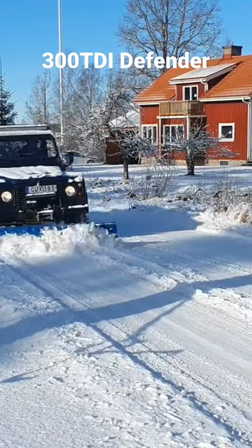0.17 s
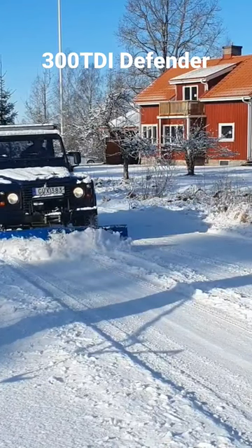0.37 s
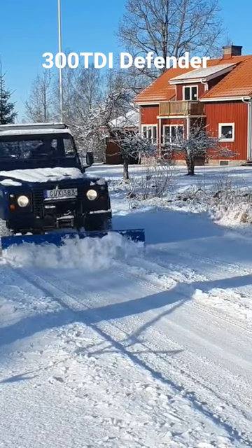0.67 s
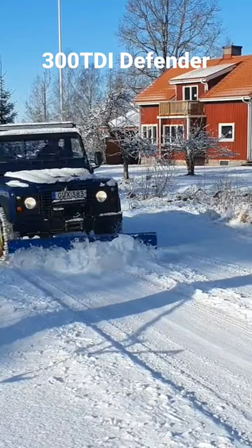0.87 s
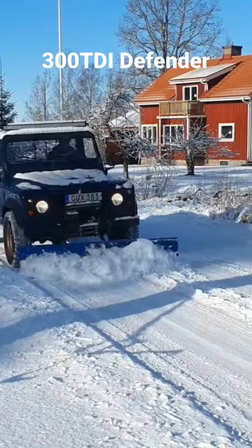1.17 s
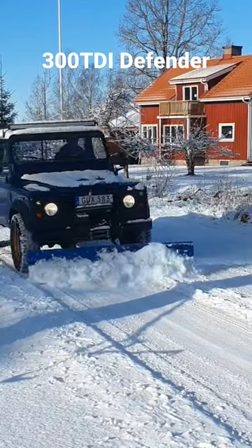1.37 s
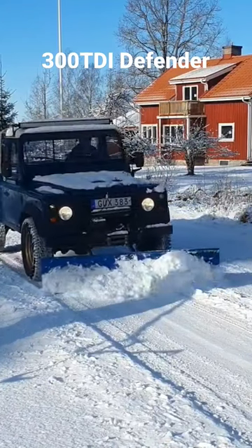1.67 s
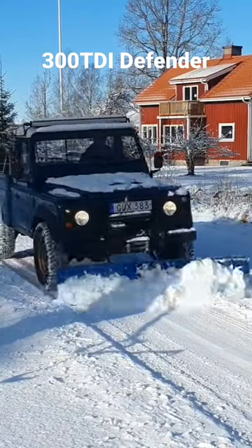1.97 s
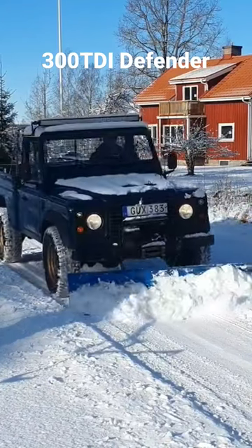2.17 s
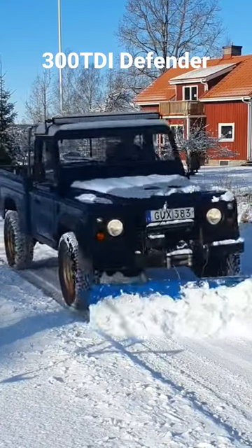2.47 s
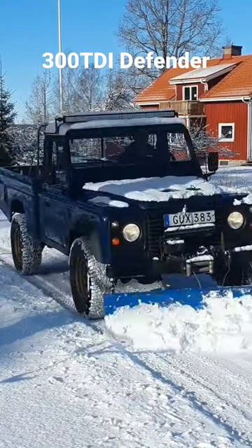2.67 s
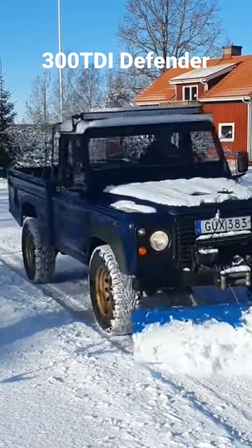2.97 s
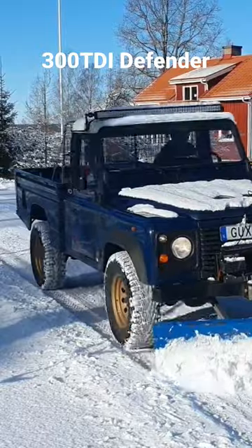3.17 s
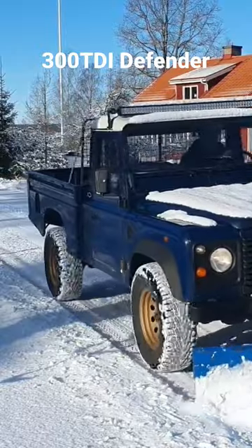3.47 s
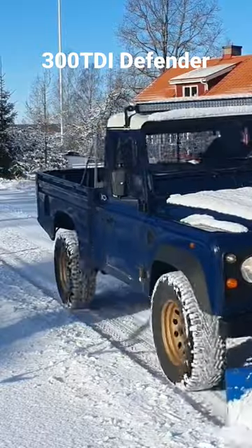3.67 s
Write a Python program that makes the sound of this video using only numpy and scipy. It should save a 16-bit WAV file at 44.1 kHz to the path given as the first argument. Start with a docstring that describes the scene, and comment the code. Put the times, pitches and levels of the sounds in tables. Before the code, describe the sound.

Diesel truck rattling nearer at low steady revs, plow blade knocking and scraping through crunchy snow.

```python
"""Snowy yard: a four-cylinder diesel truck creeps up from the left until level, pushing snow with a steel blade.
Firings strike engine resonances and gate clatter noise; low orders waver over patchy exhaust noise.
Blade and mount thud and clank: ragged bursts of contacts ring steel modes. Snow is crunching coloured noise.
Two microphone ports hear the treble from the left, less so as the truck draws level.
Faint noise in the top treble is kept in some patches and dropped in others."""
import sys
import numpy as np
from scipy import signal
from scipy.fft import rfft, irfft, next_fast_len
from scipy.io import wavfile
from scipy.ndimage import uniform_filter1d, map_coordinates

SR = 44100
rng = np.random.default_rng(int(sys.argv[2]) if len(sys.argv) > 2 else 0)


def gain_from_db(level_db):
    """Convert decibel levels to linear amplitude factors (20 dB per decade)."""
    decades = np.asarray(level_db, float) / 20
    return 10 ** decades


def generate_wav(sig):
    """Save sig (samples, or channels by samples) to the path in sys.argv[1] as 16-bit PCM at SR."""
    pcm = np.round(np.clip(np.atleast_2d(sig).T, -1, 1) * 32767).astype(np.int16)
    wavfile.write(sys.argv[1], SR, pcm)


N = 168462
SECONDS = np.arange(N) / SR


def unit(x):
    """Scale to rms 1."""
    return x / np.sqrt(np.mean(x ** 2) + 1e-20)


def along(points, hz):
    """Interpolate (Hz, value) points on a log frequency axis."""
    f, v = np.transpose(points)
    return np.interp(np.log(hz + 1), np.log(f + 1), v)


def wobble(knots_per_s):
    """Smooth random curve through normal knots."""
    knots = rng.standard_normal(int(N * knots_per_s / SR) + 4)
    return map_coordinates(knots, [np.arange(N) * knots_per_s / SR])


def filtered(x, response):
    """Multiply the spectrum of x by a complex response of frequency."""
    m = next_fast_len(N + SR // 2)
    return irfft(rfft(x, m) * response(np.fft.rfftfreq(m, 1 / SR)), m)[..., :N]


def resonances(peaks):
    """Causal response of a bank of resonances of alternating sign."""
    def response(f):
        total = 0
        for k, (centre, width, db) in enumerate(peaks):
            total = total + (-1) ** k * gain_from_db(db) * 1j * f * width / (centre ** 2 - f ** 2 + 1j * f * width)
        return total
    return response


def patches(shape, bins, frames):
    """Random time-frequency field, smoothed into patches."""
    field = uniform_filter1d(rng.standard_normal(shape), size=bins, axis=0)
    return unit(uniform_filter1d(field, size=frames, axis=1))


def rush(spectrum, patchy_db, gate=1):
    """Gated coloured noise of rms 1 with patches of random gain."""
    z = signal.stft(gate * rng.standard_normal(N), nperseg=512)[2]
    gain = gain_from_db(patchy_db * patches(z.shape, bins=5, frames=8))
    x = signal.istft(z * gain, nperseg=512)[1][:N]
    return unit(filtered(x, lambda hz: gain_from_db(along(spectrum, hz))))


# Truck's work. Each row: time in seconds, knock base level in dB, exhaust base level in dB,
# snow base level in dB (before SNOW_DB).
WORK = [(0.0, -38.5, -34, -38.5), (0.36, -37, -38, -39), (1.2, -37, -39.5, -40),
        (1.41, -35.5, -38.5, -40.5), (1.82, -36, -39, -40.5), (2.37, -34, -38, -37.5),
        (2.88, -34, -37.5, -35), (3.02, -34.5, -36.5, -34), (3.47, -34, -33.5, -31),
        (3.56, -35.5, -33, -31.5), (3.82, -34.5, -31.5, -29.5)]


def work_levels():
    """Knock, exhaust and snow levels, sample by sample."""
    s, *columns = np.transpose(WORK)
    return [np.interp(SECONDS, s, column) for column in columns]


# Approach. Each row: time in seconds, share of the way from far left to level (0 to 1).
APPROACH = [(0, 0.04), (1.6, 0.1), (2.9, 0.64), (3.82, 0.99)]


def nearness(seconds):
    """Share of the way the truck has come."""
    return np.interp(seconds, *np.transpose(APPROACH))


# Top treble colour. Each row: frequency in Hz, relative level in dB.
TOP_COLOUR = [(7000, -46), (8000, -0.5), (11000, 2), (13500, 4.5), (15600, -4), (15750, -120)]
# How readily the top treble is kept, in time. Each row: time in seconds, offset in spreads of the chance field.
KEPT_IN_TIME = [(0, -.9), (1, -.5), (1.8, .1), (3.82, 0)]
# How readily it is kept, by frequency. Each row: frequency in Hz, offset in spreads of the chance field.
KEPT_BY_HZ = [(8500, -.7), (11500, .2), (13600, .5), (15500, -1)]
TOP_START_DB, TOP_GROWS_DB_PER_S = -63.5, 1  # before the flares
FLARE_RMS, FLARE_S = .65, .006  # scale after the square root; time constant


def top_treble():
    """Faint top treble, partly shared by the ports, kept in some patches, dropped in others; louder with the clanks."""
    at = [round(row[0] * SR) for row in MOUNT_CLANKS]
    bursts = np.bincount(at, gain_from_db([2 * row[1] for row in MOUNT_CLANKS]), N)
    smoothed = unit(filtered(bursts, lambda f: 1 / (1 + 2j * np.pi * f * FLARE_S) ** 2))
    flare = FLARE_RMS * np.sqrt(np.abs(smoothed))
    hz, t, z = signal.stft(rng.standard_normal((3, N)), SR, nperseg=1024)
    chance = patches(z.shape[1:], bins=9, frames=6) + along(KEPT_BY_HZ, hz)[:, None]
    chance = chance + np.interp(t, *np.transpose(KEPT_IN_TIME)) + np.interp(t, SECONDS, flare)
    kept = chance > 0
    shared, left, right = signal.istft(z * kept, nperseg=1024)[1][:, :N]
    pair = np.array([shared + 2.9 * left, np.roll(shared, shift=2) + 3.0 * right])
    noise = unit(filtered(pair, lambda hz: gain_from_db(along(TOP_COLOUR, hz))))
    return gain_from_db(TOP_START_DB + TOP_GROWS_DB_PER_S * SECONDS) * (1 + flare ** 2) * noise


# Snow colour. Each row: frequency in Hz, relative level in dB.
SNOW_COLOUR = [(880, -1.5), (1500, -11), (1710, -3.5), (2150, -8), (2980, -6), (3550, -14), (4330, -8),
               (4760, -11.5), (6660, -18), (8600, -23.5), (11200, -83), (16000, -120)]
SNOW_DB = -2.5


def snow():
    """Snow rolls and crunches off the blade: coloured noise under a fast and a slow random gain."""
    crunch = gain_from_db(0.68 * wobble(300) + 1.2 * wobble(24.88))
    return gain_from_db(work_levels()[2] + SNOW_DB) * rush(SNOW_COLOUR, patchy_db=2.0, gate=crunch)


def struck(events, modes, rasp, edge, gain_db, rasp_db, grit_db, favour_db):
    """Each event is a ragged rattle of contacts: it rasps and rings the modes, most those near its pitch."""
    favour_oct, detune = 0.25, .012
    out, t = np.zeros(N + SR), np.arange(SR // 4) / SR
    hz = np.fft.rfftfreq(len(t), 1 / SR)
    f, mode_db, t60 = np.transpose(modes)[..., None]

    def peaked(y):
        return y / np.sqrt(uniform_filter1d(y ** 2, size=300).max())

    def tinted(y, points):
        return peaked(irfft(rfft(y) * gain_from_db(along(points, hz)), len(t)))

    def clumps(size):
        return np.repeat(rng.standard_normal(len(t) // size + 1), size)[:len(t)]

    for s, db, pitch_hz, rattle_s, edge_db in events:
        u = t / max(rattle_s, .001)
        ragged = gain_from_db(grit_db * (clumps(size=40) + clumps(size=130)))
        contacts = u ** 3 * np.exp(-2 * u) * ragged * rng.standard_normal(len(t))
        mode_hz = f * (1 + detune * rng.standard_normal(f.shape))
        decays = gain_from_db(-60 * t / t60) * np.sin(2 * np.pi * mode_hz * t)
        rung = signal.fftconvolve(contacts[None], decays, axes=1)[:, :len(t)]
        rung = rung / np.abs(rung).max(axis=1, keepdims=True)
        near_db = favour_db * np.exp(-(np.log2((f + 1) / pitch_hz) / favour_oct) ** 2)
        ring = (gain_from_db(mode_db + near_db + 2 * rng.standard_normal(f.shape)) * rung).sum(axis=0)
        y = peaked(ring) + gain_from_db(rasp_db) * tinted(contacts, rasp)
        y = y + gain_from_db(edge_db) * tinted(np.roll(contacts, 60), edge)
        start = max(round((s - rattle_s / 2) * SR), 0)
        out[start:][:len(t)] += gain_from_db(db + gain_db) * y
    return out[:N]


# Blade on the ground. Each row: time in seconds, level in dB (before gain_db), favoured pitch in Hz,
# rattle time scale in seconds, deep edge in dB over the ring.
BLADE_THUDS = [(0.02, -34, 134, 0.0046, -17), (0.213, -29.5, 148, 0.0097, 5),
               (0.377, -22.5, 233, 0.0028, -1), (0.458, -22, 620, 0.011, -20),
               (0.487, -19.5, 300, 0.0084, -21), (0.516, -22.5, 240, 0.0086, -4),
               (0.545, -38, 165, 0.011, -7), (0.653, -34.5, 291, 0.0071, -1),
               (0.757, -24.5, 413, 0.0059, -10), (0.941, -24, 260, 0.007, -13),
               (1.054, -26, 256, 0.0051, -50), (1.148, -28, 166, 0.0059, 9),
               (1.259, -16.5, 219, 0.009, -11), (1.424, -18, 308, 0.0065, -26),
               (1.453, -20, 240, 0.00774, -10), (2.111, -25.5, 290, 0.0075, -19),
               (2.444, -23, 380, 0.0065, -10), (2.792, -15.5, 244, 0.0063, -32),
               (2.978, -20.5, 255, 0.0068, -8), (3.065, -28.5, 570, 0.0073, -25),
               (3.231, -24.5, 131, 0.0081, -0.5), (3.378, -14, 230, 0.0067, -8.5),
               (3.409, -18, 138, 0.0073, -8), (3.479, -20, 221, 0.0056, -17),
               (3.569, -18, 210, 0.0062, -27), (3.698, -14.5, 236, 0.0057, -15),
               (3.73, -17.5, 252, 0.0076, -6)]
# Blade modes. Each row: nominal frequency in Hz, nominal level in dB, t60 in seconds.
BLADE_MODES = [(62, -14, 0.098), (132, -23, 0.29), (162, 1.5, 0.18), (195.3, -6.5, 0.19),
               (233.1, -3.5, 0.12), (260, -5.5, 0.16), (291, -1, 0.12), (380, 3, 0.11), (492, -1, 0.13),
               (630, 3, 0.051)]
# Blade's dull rasp. Each row: frequency in Hz, relative level in dB.
DULL_RASP = [(40, -42), (100, -30.5), (250, -3), (600, -10.5), (1000, -18), (3000, -71)]
# Deep edge of a thud. Each row: frequency in Hz, relative level in dB.
DEEP_EDGE = [(30, -27), (55, 11), (110, 8), (160, -46), (400, -66)]


def thuds():
    """The blade thuds on the ground: contacts ring its low modes."""
    return struck(BLADE_THUDS, BLADE_MODES, DULL_RASP, DEEP_EDGE,
                  gain_db=-7, rasp_db=-6, grit_db=2.5, favour_db=13)


# Mount and pins. Each row: time in seconds, level in dB (before gain_db), favoured pitch in Hz,
# rattle time scale in seconds, bright edge in dB over the ring.
MOUNT_CLANKS = [(0.0044, -23, 1130, 0.0027, -8.5), (0.2133, -24.5, 1490, 0.0042, -14),
                (0.277, -22.5, 2280, 0.0035, -12), (0.336, -30, 2200, 0.005, -11),
                (0.3549, -19, 2200, 0.0051, -15), (0.377, -21, 2570, 0.003, -9.5),
                (0.4683, -28.5, 2720, 0.0033, -4.5), (0.513, -23.5, 2830, 0.0025, -18),
                (0.6567, -23.5, 2580, 0.0071, -17), (0.668, -22.5, 2012, 0.0039, -17),
                (0.7627, -23, 1850, 0.0021, -17), (0.9019, -28, 2900, 0.0029, -10),
                (0.9343, -22, 2240, 0.0048, -18), (0.9561, -24, 2180, 0.0042, -15),
                (1.1363, -20, 2870, 0.0048, -13.5), (1.2544, -25.5, 2500, 0.0035, -10),
                (1.4142, -18, 2340, 0.0037, -27), (1.4534, -28, 1350, 0.004, -11),
                (2.434, -18, 1710, 0.003, -13.5), (2.5017, -23, 2900, 0.0033, -10),
                (2.7885, -13.5, 3230, 0.0057, -8), (2.8069, -19, 1100, 0.004, -10),
                (2.971, -25.5, 1340, 0.0067, -12), (3.064, -23, 1650, 0.0037, -7.5),
                (3.221, -25.5, 3400, 0.0051, -3), (3.3772, -15.5, 1300, 0.0047, -8),
                (3.48, -16, 1160, 0.0042, -8), (3.573, -14, 2830, 0.0034, -9),
                (3.7002, -15, 1880, 0.00266, -10), (3.7231, -11.5, 2920, 0.0034, -7.5)]
# Steel modes. Each row: nominal frequency in Hz, nominal level in dB, t60 in seconds.
STEEL_MODES = [(663, 1.5, 0.016), (1272, -4.5, 0.062), (1387, 0, 0.062), (1758, -2.5, 0.028),
               (2073, -4, 0.057), (2250, -0.5, 0.022), (2450, -3, 0.024), (2718, -2, 0.072),
               (2900, 1.5, 0.042), (3230, 0, 0.042), (3910, -7.5, 0.057), (4367, -7, 0.072)]
# Contacts' own rasp. Each row: frequency in Hz, relative level in dB.
STEEL_RASP = [(500, -9), (1000, -28), (2500, 2.5), (4500, 1.5), (7000, -12.5), (9000, -5.5)]
# Bright edge of a clank. Each row: frequency in Hz, relative level in dB.
BRIGHT_EDGE = [(3500, -52), (4800, 10.5), (6000, 7.5), (7500, 0.5)]


def clanks():
    """Mount and pins clank: contacts ring small steel modes."""
    return struck(MOUNT_CLANKS, STEEL_MODES, STEEL_RASP, BRIGHT_EDGE,
                  gain_db=-6, rasp_db=-3.5, grit_db=3.0, favour_db=9.5)


def wavering(orders, turns):
    """Sines at multiples of the firing rate, wavering in level and phase."""
    waver_db, waver_rad = 3.3, .45
    total = 0
    for k, db in orders:
        phase = 2 * np.pi * k * turns + waver_rad * np.sqrt(k) * wobble(12)
        total = total + gain_from_db(db + waver_db * wobble(20)) * np.sin(phase)
    return total


# Exhaust noise. Each row: frequency in Hz, relative level in dB.
EXHAUST_NOISE = [(15, -47), (25, -1), (59, -2.5), (92, 4), (109, 0), (119, -18), (151, -4), (168, -59),
                 (300, -18), (390, -46), (660, -120)]
# Exhaust hum. Each row: multiple of the firing rate, mean level in dB over the exhaust base level.
EXHAUST_ORDERS = [(1, -14), (1.75, -9), (2, -3), (7, -19)]


def exhaust(turns):
    """Low firing orders waver over patchy exhaust noise."""
    noise = gain_from_db(0.5) * rush(EXHAUST_NOISE, patchy_db=-4.5)
    return gain_from_db(work_levels()[1]) * (wavering(EXHAUST_ORDERS, turns) + noise)


# Cylinder blows. One mean level in dB per cylinder, in firing order.
CYLINDER_LEVELS = [0, -1, .5, -1.5]
SETTLED_HZ, EXTRA_HZ, SETTLE_S = 47.74, 2.5, .9
JITTER_PERIODS, SCATTER_DB = .007, 1.2


def firing():
    """Firing count and blow impulses; the revs settle as snow piles up."""
    rate_hz = SETTLED_HZ + EXTRA_HZ * np.exp(-SECONDS / SETTLE_S)
    turns = np.cumsum(rate_hz * (1 + 0.00204 * wobble(3.05))) / SR
    fired = np.flatnonzero(np.diff(np.floor(turns)))
    late, louder = rng.standard_normal((2, len(fired)))
    at = fired + (JITTER_PERIODS * late * SR / rate_hz[fired]).astype(int)
    blows = np.zeros(N)
    blows[np.clip(at, 0, N - 1)] = gain_from_db(np.resize(CYLINDER_LEVELS, len(fired)) + SCATTER_DB * louder)
    return turns, blows


# Engine block and covers. Each row: frequency in Hz, width in Hz, level in dB.
BLOCK_PEAKS = [(577, 48, 5.5), (615.5, 59, 2), (960, 64, -1), (1345, 40.5, 3), (1703, 29, 0),
               (2931, 97, -7.5), (4140, 200, -12.5)]
# Side panels, heard as the truck draws level. Each row: frequency in Hz, width in Hz, level in dB.
FLANK_PEAKS = [(382, 24, -1.5), (473, 14, 2.5), (1196, 12.6, 1.5), (1520, 37, -4), (1860, 15, -2)]
# Clatter colour. Each row: frequency in Hz, relative level in dB.
CLATTER_COLOUR = [(150, -62), (250, -41), (577, -2.5), (627, -10), (795, -7.5), (1690, -10), (2140, -20),
                  (3160, -12.5), (7000, -34), (9100, -65), (15400, -120)]
# Orders the block sings. Each row: multiple of the firing rate, mean level in dB over the knock base level.
BLOCK_ORDERS = [(12, -16), (13, -7), (20, -12.5), (28, -14), (36, -11)]
KNOCK_DB, RING_DB, FLANK_DB, CLATTER_DB = -10, -6.5, -0.5, -5
GATE_S, GATE_FLOOR = .008, 1.3


def block(turns, blows):
    """Each firing knocks the block and lets out a burst of clatter; high orders sing."""
    gate = GATE_FLOOR + unit(filtered(blows, lambda f: 1 / (1 + 2j * np.pi * f * GATE_S)))
    body = resonances(BLOCK_PEAKS)
    knock = gain_from_db(KNOCK_DB) * unit(filtered(blows, body))
    ring = gain_from_db(RING_DB) * unit(filtered(gate * rng.standard_normal(N), body))
    panels = unit(filtered(gate * rng.standard_normal(N), resonances(FLANK_PEAKS)))
    panels = gain_from_db(FLANK_DB) * nearness(SECONDS) * panels
    clatter = gain_from_db(CLATTER_DB) * rush(CLATTER_COLOUR, patchy_db=0.0, gate=gate)
    top = filtered(knock + ring + panels + clatter, lambda f: (1j * f / (300 + 1j * f)) ** 2)
    level = gain_from_db(work_levels()[0] + 1.0 * wobble(6.92))
    return level * (top + wavering(BLOCK_ORDERS, turns))


def engine():
    """Block and exhaust driven by the same firings."""
    turns, blows = firing()
    return exhaust(turns) + block(turns, blows)


# Port level, truck far left. Each row: frequency in Hz, left over right in dB.
FAR_LEVEL = [(300, -1), (650, 3.5), (1000, 8.5), (2100, 10.5), (3000, 10.5), (4000, 14.5), (6000, 12),
             (8000, -2)]
# Port level, truck level. Each row: frequency in Hz, left over right in dB.
NEAR_LEVEL = [(300, -2), (650, -2.5), (1000, -0.5), (2100, 5.5), (3000, 2), (4000, 6), (5000, 7),
              (6200, 21), (8000, -15)]
# Port phase, truck far left. Each row: frequency in Hz, left lead in rad.
FAR_PHASE = [(100, 0), (350, .35), (800, 1.1), (2100, 1.3), (4000, 1.2), (5000, 0), (6200, -1.5)]
# Port phase, truck level. Each row: frequency in Hz, left lead in rad.
NEAR_PHASE = [(100, 0), (700, -.1), (1500, -1), (2100, -1.9), (4000, -2), (5000, -3), (6200, -1.5)]
# Scattered sound at each port. Each row: frequency in Hz, level in dB (before doubling).
YARD_SCATTER = [(5, -2), (90, -15), (300, -16), (700, -13), (1500, -8), (3000, -7), (6000, -8)]


def ports(x):
    """Port level and phase slide as the truck draws level; scattered sound has random phase at each port."""
    hz, t, z = signal.stft(x, SR, nperseg=512)
    share = nearness(t)

    def mix(far, near):
        return np.outer(along(far, hz), 1 - share) + np.outer(along(near, hz), share)

    half = gain_from_db(mix(FAR_LEVEL, NEAR_LEVEL) / 2) * np.exp(.5j * mix(FAR_PHASE, NEAR_PHASE))
    random_phase = np.exp(2j * np.pi * rng.random((2, *z.shape)))
    scatter = 2 * gain_from_db(along(YARD_SCATTER, hz))[:, None] * np.abs(z) * random_phase
    norm = 2 / (np.abs(half) + 1 / np.abs(half))
    pair = np.array([(z + scatter[0]) * half, (z + scatter[1]) / half]) * norm
    return signal.istft(pair, SR, nperseg=512)[1][:, :N]


def scene():
    """Engine, snow, clanks and thuds ride on the truck, cut steeply above TRUCK_TOP_HZ; top treble is added."""
    TRUCK_TOP_HZ = 7495
    truck = engine() + snow() + clanks() + thuds()
    truck = filtered(truck, lambda hz: 1 / (1 + (hz / TRUCK_TOP_HZ) ** 40))
    return ports(truck) + top_treble()


def roll_off(x):
    """The treble ends steeply here."""
    return signal.sosfilt(signal.butter(12, 15710, fs=SR, output="sos"), x)


def record(dry):
    """The microphone loses the deepest bass: two first-order high-passes."""
    MIC_LOW_HZ = 46
    mix = filtered(dry, lambda hz: (1j * hz / (MIC_LOW_HZ + 1j * hz)) ** 2)
    return roll_off(mix)


dry = scene()
out = record(dry)
generate_wav(out)
```